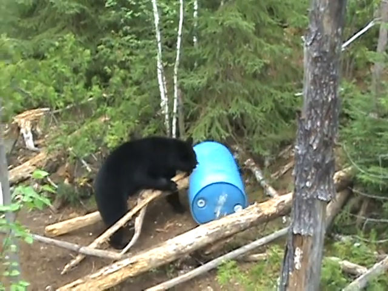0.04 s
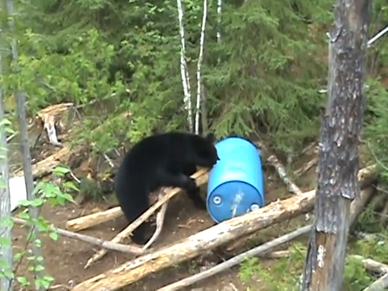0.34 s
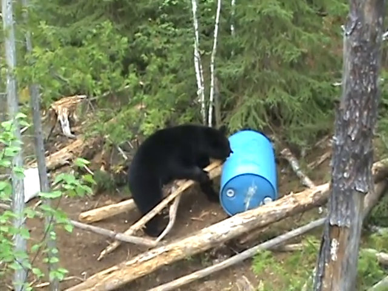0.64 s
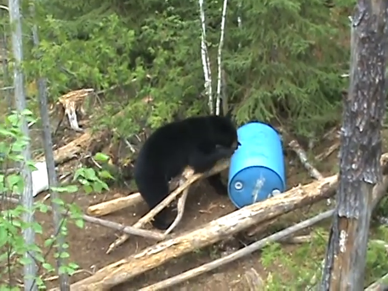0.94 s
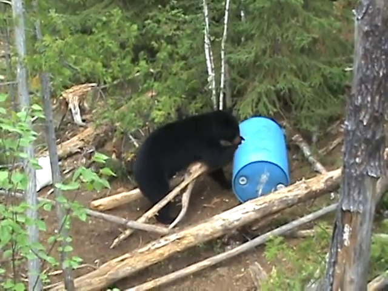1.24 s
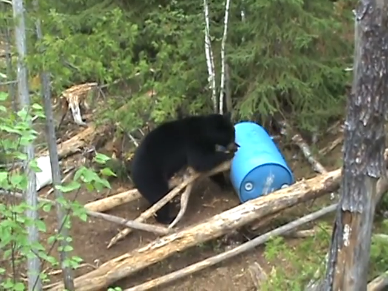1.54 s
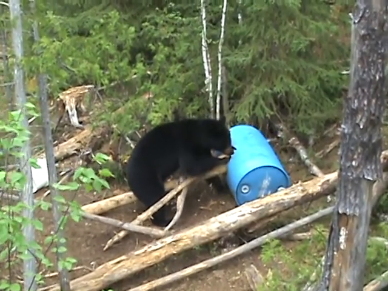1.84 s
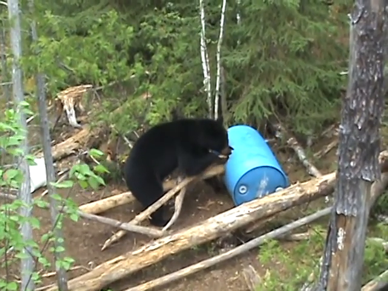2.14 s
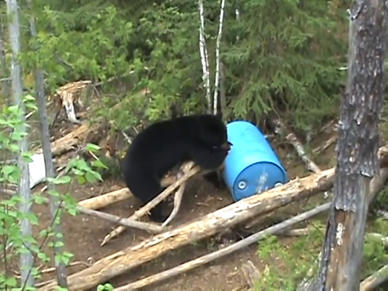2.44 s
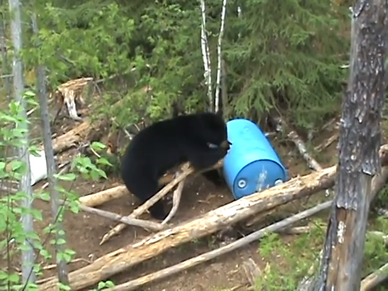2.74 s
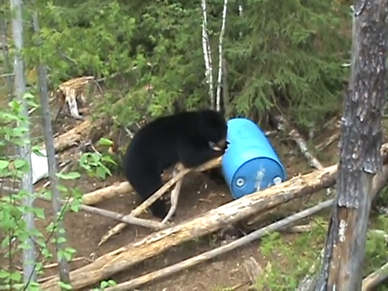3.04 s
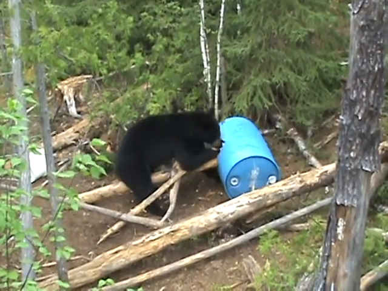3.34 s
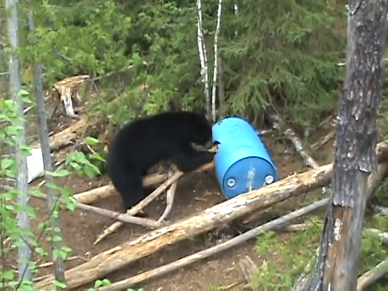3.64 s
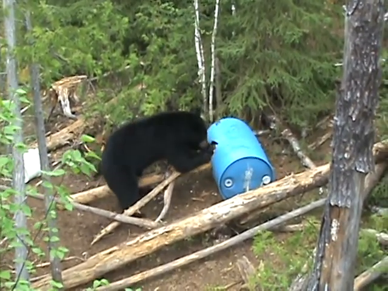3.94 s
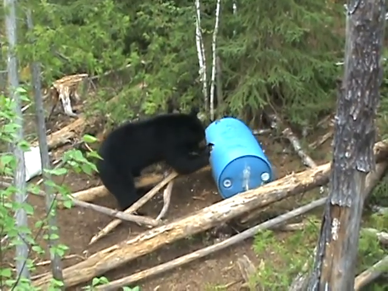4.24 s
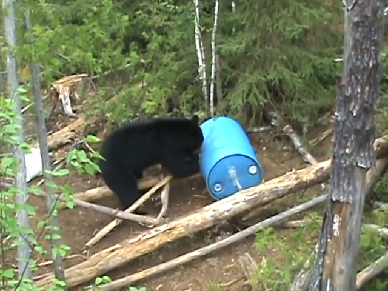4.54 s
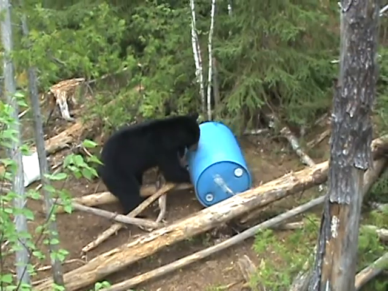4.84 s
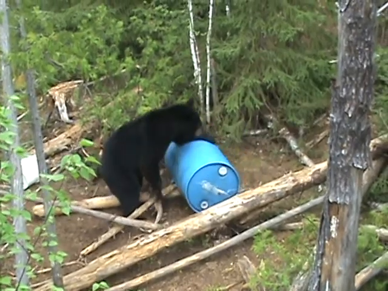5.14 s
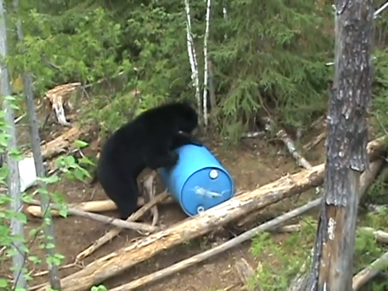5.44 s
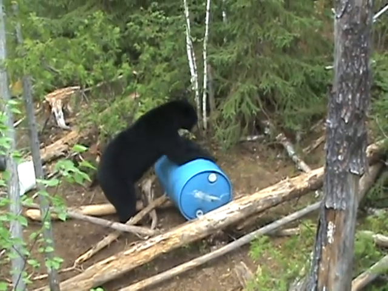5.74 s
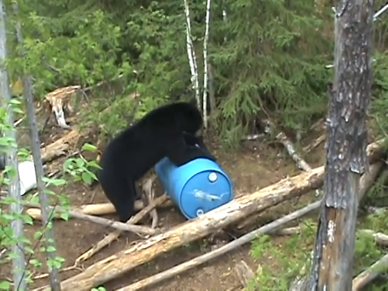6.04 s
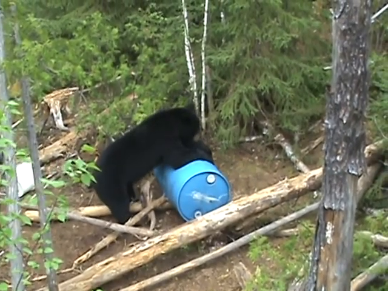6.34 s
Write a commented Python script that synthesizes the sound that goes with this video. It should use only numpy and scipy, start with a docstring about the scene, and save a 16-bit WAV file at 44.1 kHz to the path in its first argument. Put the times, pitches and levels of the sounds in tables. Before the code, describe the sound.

In a quiet forest, light wind bumps the microphone, paws scuff dry needles and a small bird gives one thin note. A bear snuffles, then shoves a hollow plastic barrel over logs in three bouts. The barrel booms, knocks and briefly groans while bark grinds and twigs crack sharply. Short puffs of breath come between the pushes and once more after the barrel settles.

```python
"""A bear shoves a hollow plastic barrel over logs and sticks in a quiet forest.
First, light wind bumps the microphone, paws scuff dry needles and a small bird calls once.
The bear snuffles, then shoves in bouts from 1.3 s, with more snuffles between. Each shove builds, holds
and dies away: stick-slip and blows make the barrel boom, groan and knock, bark grinds and rips, twigs
crack. The barrel settles, and the bear snuffles once more at 6.2 s."""
import sys
import numpy as np
from scipy import signal
from scipy.fft import rfft, irfft, next_fast_len
from scipy.io import wavfile
from scipy.ndimage import uniform_filter1d, map_coordinates

SR = 44100
rng = np.random.default_rng(int(sys.argv[2]) if len(sys.argv) > 2 else 0)


def store_pcm(level_fs):
    """Save levels as 16-bit WAV."""
    pcm = np.round(np.clip(level_fs, -1, 1) * 32767).astype(np.int16)
    wavfile.write(sys.argv[1], SR, np.atleast_2d(pcm).T)


N = 287091
TIME = np.arange(N) / SR


def amp(db):
    return 10 ** (np.asarray(db) / 20)


def unit_rms(x):
    return x / np.sqrt(np.mean(x ** 2) + 1e-20)


def along(points, hz):
    """Interpolate (freq_hz, value) points on a log axis."""
    freqs_hz, values = np.transpose(points)
    return np.interp(np.log(hz + 1), np.log(freqs_hz + 1), values)


def wobble(knots_per_s):
    """Smooth random curve, spread about 1."""
    return map_coordinates(rng.standard_normal(int(N * knots_per_s / SR) + 4), [TIME * knots_per_s])


def filtered(x, response):
    """Apply a complex frequency response."""
    size = x.shape[-1]
    padded = next_fast_len(size + 8192)
    return irfft(rfft(x, padded) * response(np.fft.rfftfreq(padded, 1 / SR)), padded)[..., :size]


def coloured(x, gain, size=8192):
    """Minimum-phase filter with magnitude gain(hz)."""
    cepstrum = irfft(np.log(np.maximum(gain(np.fft.rfftfreq(size, 1 / SR)), 1e-6)))
    cepstrum[1:size // 2] *= 2
    cepstrum[size // 2 + 1:] = 0
    return signal.fftconvolve(x, irfft(np.exp(rfft(cepstrum))))[:len(x)]


def shaped(x, spectrum):
    """Filter by (freq_hz, gain_db) points; rms 1."""
    return unit_rms(coloured(x, lambda hz: amp(along(spectrum, hz))))


def resonance(hz, centre_hz, q):
    """Band-pass magnitude, peak 1."""
    return 1 / np.hypot(1, q * (hz / centre_hz - centre_hz / (hz + 1)))


def patchy(x, depth_db, bins, frames):
    """Random gain over time and frequency: resonances come and go."""
    spectra = signal.stft(x, nperseg=512)[2]
    field = rng.standard_normal(spectra.shape)
    for axis, width in enumerate((bins, frames)):
        field = uniform_filter1d(uniform_filter1d(field, width, axis), width, axis)
    return unit_rms(signal.istft(spectra * amp(depth_db * unit_rms(field)), nperseg=512)[1][:N])


def slips(per_s, spread_db, smooth):
    """Random slip impulses of uneven size over a share of smooth friction."""
    sizes = amp(spread_db * np.minimum(rng.standard_normal(N), 2))
    impulses = (rng.random(N) < per_s / SR) * sizes * rng.choice([-1, 1], N)
    return unit_rms(impulses) + smooth * rng.standard_normal(N)


def swell(start_s, rise_s, length_s, fall_db_per_s):
    """Envelope: linear rise, hold, exponential fall from length_s after the start."""
    t = TIME - start_s
    return np.clip(t / rise_s, 0, 1) * amp(-fall_db_per_s * np.maximum(t - length_s, 0))


def add(track, start_s, sound, level_db, span_s):
    """Mix in a sound whose energy, spread over span_s, has level_db."""
    part = track[round(start_s * SR):][:len(sound)]
    part += (amp(level_db) * np.sqrt(span_s * SR) * sound / np.linalg.norm(sound))[:len(part)]


# still air: freq_hz, gain_db
HUSH_SPECTRUM = [(20, -3.5), (65, -4), (150, -10.5), (300, -10.5), (720, -10.5), (1050, -16), (2900, -18.5),
                 (16000, -32)]

def forest(level_db=-56.5):
    """Soft hush of the woods, more alike at both microphone ports in the treble."""
    common, left, right = (shaped(rng.standard_normal(N), HUSH_SPECTRUM) for _ in range(3))
    diffuse = filtered(np.array([left, right]), lambda hz: along([(3000, 1.0), (12000, 0.54)], hz))
    return amp(level_db + wobble(4.234)) * (common + diffuse)


# air on the microphone: freq_hz, gain_db
GUST_SPECTRUM = [(15, -25), (35, 0), (75, -0.5), (200, -17.5), (400, -37.5), (1500, -120)]
# gusts: start_s, length_s, level_db
GUSTS = [(0, 0.035, -27), (0.08, 0.39, -36), (0.691, 0.099, -41), (2.4, 0.1, -40.5), (2.577, 0.1, -37)]

def wind(breeze_end_s=2.53, breeze_db=-54, shared_below_hz=52):
    """Gusts and a faint draught bump the microphone; large eddies cover both ports at once."""
    gusts = [amp(level_db) * swell(start_s, 0.017, length_s, fall_db_per_s=174)
             for start_s, length_s, level_db in GUSTS + [(0, breeze_end_s, breeze_db)]]
    lumps = amp(2.2 * wobble(28))
    common, left, right = (shaped(rng.standard_normal(N), GUST_SPECTRUM) for _ in range(3))
    split_rad = lambda hz: np.arctan((hz / shared_below_hz) ** 2)
    large_eddies = filtered(common, lambda hz: np.cos(split_rad(hz)))
    small_eddies = filtered(np.array([left, right]), lambda hz: np.sin(split_rad(hz)))
    return np.max(gusts, axis=0) * lumps * (large_eddies + small_eddies) * amp([[1.5], [-1]])


# reverberation among trunks: freq_hz, t60_s
TREE_DECAY = [(100, 0.65), (2000, 0.68), (12000, 0.25)]

def trees(x):
    """Trunks scatter a short tail, different on each side."""
    hz, t, spectra = signal.stft(rng.standard_normal((2, SR // 2)), SR, nperseg=256)
    decay = amp(-60 * t / along(TREE_DECAY, hz)[:, None])
    tail = signal.istft(spectra * decay, SR, nperseg=256)[1]
    return signal.fftconvolve(x[None], tail / np.linalg.norm(tail[0]), axes=1)[:, :N]


def bird(start_s=0.488, length_s=0.053, start_hz=6200, end_hz=5750, level_db=-47):
    """One thin falling note, smeared by the trees."""
    progress = np.clip((TIME - start_s) / length_s, 0, 1)
    pitch_hz = start_hz + (end_hz - start_hz) * progress + 110 * wobble(400)
    note = np.sin(np.pi * progress) * np.sin(2 * np.pi * np.cumsum(pitch_hz) / SR)
    return amp(level_db) * (note + trees(note) / 2)


# dry needles: freq_hz, gain_db
NEEDLE_SPECTRUM = [(300, -14), (1150, 0), (2300, 1), (3600, -1.5), (4600, -3.5), (7000, -5.5),
                   (10000, -14.5), (16000, -32)]
# feet shifting before the first shove: peak_s, half_length_s, level_db
PAW_SCUFFS = [(0.025, 0.12, -49.5), (0.169, 0.064, -46), (0.34, 0.17, -50), (0.597, 0.12, -54)]

def paws():
    """Paws scuff through dry needles, which crackle."""
    needles = patchy(slips(per_s=500, spread_db=7, smooth=1.1), depth_db=3.2, bins=3, frames=15)
    scuffs = [amp(level_db) * np.exp(-((TIME - peak_s) / half_length_s) ** 2)
              for peak_s, half_length_s, level_db in PAW_SCUFFS]
    return np.linalg.norm(scuffs, axis=0) * amp(1.5 * wobble(45)) * shaped(needles, NEEDLE_SPECTRUM)


# nostril hiss: freq_hz, gain_db
NOSTRIL_SPECTRUM = [(300, 10.5), (1250, 4.5), (1750, 3), (2350, -1), (3400, -1.5), (5600, -5), (9500, -4),
                    (15000, -23)]
# puffs of breath: peak_s, length_s, hiss_db, hiss_hz, muzzle_db, muzzle_hz
PUFFS = [(0.66, 0.054, -50, 4760, -59, 786), (0.821, 0.076, -49, 3720, -75, 800),
         (0.964, 0.095, -45.5, 3960, -65, 814), (1.117, 0.027, -41, 1290, -43, 640),
         (1.161, 0.06, -45, 2000, -49.5, 825), (2.614, 0.034, -49, 3200, -49, 1300),
         (3.57, 0.056, -31, 2080, -35.5, 1770), (3.61, 0.1, -44.5, 1690, -42.5, 815),
         (4.052, 0.06, -43.5, 3460, -47, 720), (4.137, 0.065, -32.5, 2040, -34, 950),
         (5.582, 0.031, -39.5, 2420, -47, 1080), (6.189, 0.023, -47.5, 2800, -35.5, 800),
         (6.223, 0.071, -44.5, 2960, -53.5, 1110)]

def snuffles(rise_share=0.42):
    """Air swells through the muzzle's resonance and hisses at the nostrils, fluttering a little."""
    out = np.zeros(N)
    air = patchy(rng.standard_normal(N), depth_db=2.8, bins=3, frames=5)
    for peak_s, length_s, hiss_db, hiss_hz, muzzle_db, muzzle_hz in PUFFS:
        near = np.abs(TIME - peak_s) < 0.25
        t = TIME[near] - peak_s
        width_s = length_s * np.where(t < 0, rise_share, 1 - rise_share)
        flow = np.exp(-np.abs(t / width_s) ** 1.5)
        muzzle = coloured(rng.standard_normal(len(t)), lambda hz: resonance(hz, muzzle_hz, q=3.2) ** 2)
        nostrils = lambda hz: amp(along(NOSTRIL_SPECTRUM, hz)) * resonance(hz, hiss_hz, q=1.25)
        hiss = coloured(air[near], nostrils)
        out[near] += flow * (amp(muzzle_db) * unit_rms(muzzle) + amp(hiss_db) * unit_rms(hiss))
    return out * amp(1.5 * wobble(160))


# breaking dry wood: freq_hz, gain_db
WOOD_SPECTRUM = [(150, 4), (800, 16.5), (3500, 1), (9500, -1.5), (12000, -8), (16000, -12)]

def dry_wood(x, pitch_hz, q):
    """Colour x as breaking wood, emphasised near pitch_hz."""
    gain = lambda hz: amp(along(WOOD_SPECTRUM, hz)) * resonance(hz, pitch_hz, q) ** 2
    return coloured(x, gain, size=2048)


# loudest snaps of twigs and bark: start_s, level_db, pitch_hz, t60_s, band_q
LOUD_CRACKS = [(0.17, -37, 4030, 0.0038, 0.35), (0.2643, -34.5, 1200, 0.0084, .5),
               (1.4059, -25, 2860, 0.0065, 0.37), (1.421, -33.5, 10500, 0.0027, 1.3),
               (1.636, -18, 3480, 0.004, 2.1), (1.6389, -18, 3030, 0.013, 0.35),
               (1.6545, -30, 3450, 0.012, 1.1), (1.6986, -18.5, 6400, 0.0025, 0.63),
               (1.7492, -34.5, 3360, .0037, 0.35), (1.8317, -22.5, 3730, 0.0092, 0.46),
               (1.9066, -33, 3400, 0.0013, 0.89), (1.923, -29, 3330, 0.005, 1.8),
               (2.7165, -35.5, 2960, 0.0039, 2.4), (2.7819, -33, 2530, 0.0036, 1),
               (2.8015, -36.5, 7100, .003, 2.2), (2.9346, -29.5, 3780, 0.0011, 0.49),
               (2.9634, -26, 2800, 0.042, 0.43), (3.027, -31, 3020, 0.0052, 0.17),
               (3.1508, -27, 1460, 0.016, 0.25), (3.161, -32, 1010, 0.022, 0.32),
               (3.2301, -30.5, 2600, 0.031, 1.6), (3.2625, -34.5, 10000, 0.00073, 1.6),
               (3.279, -28, 2450, 0.052, 2.1), (3.3383, -40.5, 2920, 0.0055, 0.64),
               (3.3547, -38, 3840, 0.0056, 0.42), (3.493, -37.5, 2570, 0.028, 2.5),
               (3.624, -34.5, 2500, .025, 2.2), (4.2517, -31, 7500, 0.0015, 0.6),
               (4.3322, -26.5, 3400, 0.0053, 0.31), (4.3705, -28.5, 2110, 0.0045, 0.7),
               (4.3781, -22.5, 1440, 0.018, 0.53), (4.3987, -25.5, 3070, 0.029, 1.1),
               (4.4265, -25.5, 3020, 0.0057, 0.46), (4.4405, -26.5, 2780, 0.016, 0.36),
               (4.492, -25, 2860, 0.0018, 0.35), (4.4977, -23, 2640, 0.0088, 0.42),
               (4.5076, -23, 2200, 0.006, 0.66), (4.7521, -32.5, 2170, 0.0018, 0.51),
               (4.8558, -24, 3300, 0.0028, 0.24), (5.0974, -33, 3840, 0.0015, .45),
               (5.288, -28.5, 3180, 0.0055, 0.71), (5.3856, -25.5, 1120, 0.011, .4),
               (5.4341, -35, 2960, 0.0019, 0.55), (5.6203, -39, 4240, 0.0036, 0.36),
               (5.8535, -38, 1710, 0.017, 0.43)]

def cracks(rows):
    """A fibre breaks with a dry click and rings its stick; the freer the stick, the longer the ring."""
    out, t = np.zeros(N), TIME[:SR // 8]
    for start_s, level_db, pitch_hz, t60_s, band_q in rows:
        attack = 1 - np.exp(-t / 0.00024)
        decay = amp(-60 * t / t60_s) + amp(-24 - 60 * t / 0.066)
        burst = rng.standard_normal(len(t)) * attack * decay
        burst[8] += 1.5  # fracture impulse
        click = dry_wood(burst, pitch_hz, band_q)
        upper_hz = pitch_hz * rng.uniform(1.15, 1.45)
        modes = lambda hz: resonance(hz, 0.96 * pitch_hz, 4) ** 2 + 0.6 * resonance(hz, upper_hz, 6) ** 2
        ring = min(t60_s / 0.016, 1.5) * unit_rms(coloured(burst, modes, size=2048))
        add(out, start_s, unit_rms(click) + ring, level_db, span_s=0.0026)
    return out


def twigs(grit_gain, per_s=14, floor_db=-52.5, spread_db=1.5, t60_s=0.0018, band_q=0.5):
    """Small twigs break at random: faintly under the bear's weight, louder with the grinding."""
    rows = []
    for when, size, thinness in rng.random((round(per_s * N / SR), 3)):
        sample = when * (N - 1)
        level_db = 20 * np.log10(grit_gain[int(sample)] + amp(floor_db)) + spread_db * (2 * size - 1)
        pitch_hz = 2900 * 2 ** (0.2 * (2 * thinness - 1))
        rows.append((sample / SR, level_db, pitch_hz, t60_s, band_q))
    return cracks(rows)


# quick runs of tiny snaps: start_s, length_s, level_db, pitch_hz
BARK_RIPS = [(1.581, .004, -41, 5500), (1.779, 0.01, -37, 3300), (1.826, 0.024, -36, 3770),
             (4.292, 0.01, -33.5, 9300), (4.854, 0.0062, -30, 2660), (5.154, 0.0087, -38.5, 2700),
             (5.475, 0.03, -50.5, 13000)]

def rips():
    """A strip of bark gives way, fibre after fibre."""
    out, fibres = np.zeros(N), slips(per_s=2200, spread_db=13.5, smooth=1.0)
    for start_s, length_s, level_db, pitch_hz in BARK_RIPS:
        near = np.abs(TIME - start_s) < 0.2
        envelope = amp(level_db) * swell(start_s, 0.0029, length_s, fall_db_per_s=443)[near]
        out[near] += envelope * unit_rms(dry_wood(fibres[near], pitch_hz, q=0.54))
    return out


def splinters(per_s=600, centre_hz=3670, spread_octaves=0.65, decay_cycles=1.5):
    """Fibres break in bunches, each ringing a few cycles at its own pitch."""
    count, t = round(per_s * N / SR), TIME[:SR // 100]
    starts = rng.integers(N, size=(count, 1))
    thinness, size = rng.standard_normal((2, count, 1))
    hz = centre_hz * 2 ** (spread_octaves * np.minimum(thinness, 2))
    grains = amp(7 * np.minimum(size, 2)) * np.sin(2 * np.pi * hz * t) * np.exp(-hz * t / decay_cycles)
    crackle = np.bincount((starts + np.arange(len(t))).ravel(), grains.ravel())[:N]
    bunches = amp(4 * wobble(130))
    return unit_rms(bunches * crackle)


# modes of the wall and the air inside: freq_hz, level_db, t60_s
BARREL_MODES = [(73.2, -19.5, 0.48), (115, -15, 0.14), (155, -5, 0.061), (200.8, -5.5, 0.13),
                (254, -6, 0.041), (343, -14, 0.087), (412, -6.5, 0.08), (491, -6, 0.059), (598, -7, 0.035),
                (734, 0, 0.038), (827, -9, 0.037), (1400, -10, 0.011)]

def barrel_ring():
    """Response to one tap; each spot on the wall weighs the modes anew."""
    t = TIME[:SR // 2]
    return sum(amp(level_db + rng.normal(0, 3.9) - 60 * t / t60_s)
               * np.sin(2 * np.pi * freq_hz * rng.normal(1, 0.015) * t)
               for freq_hz, level_db, t60_s in BARREL_MODES)


# blows on the barrel: start_s, level_db, centre_hz, band_q
BLOWS = [(0.522, -48, 650, 0.7), (1.112, -44.5, 520, .5), (1.6448, -32, 700, 0.4), (1.681, -28, 576, 0.19),
         (1.837, -38.5, 600, 0.37), (2.326, -32, 650, 1.06), (3.4498, -37.5, 610, 0.44),
         (4.149, -32, 440, 1.1), (4.8572, -22.5, 550, 0.56), (4.857, -25, 166, 0.98),
         (4.866, -24.5, 650, 0.51), (4.92, -39, 85, 1.2), (5.1794, -32.5, 250, 0.3),
         (5.2055, -27.5, 470, 0.19), (5.2506, -30.5, 453, 0.14), (5.258, -27, 230, 0.5),
         (5.416, -34.5, 600, 0.47), (5.862, -44, 434, 0.87), (5.877, -42.5, 149, 0.92)]

def knocks(buzz_gain=0.46, buzz_t60_s=0.043, thunk_db=-8, thunk_t60_s=0.0056):
    """A blow thunks on the log and rings a band of the barrel's modes; the contact chatters briefly."""
    out, t = np.zeros(N), TIME[:SR // 2]
    for start_s, level_db, centre_hz, band_q in BLOWS:
        contact = buzz_gain * rng.standard_normal(len(t)) * amp(-60 * t / buzz_t60_s)
        contact[0] += 1
        ring = signal.fftconvolve(barrel_ring(), contact)[:len(t)]
        ring = coloured(ring, lambda hz: resonance(hz, centre_hz, band_q) ** 2)
        thunk = np.sin(2 * np.pi * centre_hz * t) * t * amp(-60 * t / thunk_t60_s)
        add(out, start_s, unit_rms(ring) + amp(thunk_db) * unit_rms(thunk), level_db, span_s=0.026)
    return out


# barrel juddering along a log: start_s, length_s, level_db, slips_per_s, centre_hz
JUDDERS = [(2.851, 0.055, -33.5, 174, 710), (3.432, 0.0089, -36, 150, 624)]

def groans(jitter=0.07, fall_db_per_s=450):
    """Nearly regular slips drive the barrel's modes into a short hollow groan."""
    out, t = np.zeros(N), TIME[:SR // 4]
    for start_s, length_s, level_db, slips_per_s, centre_hz in JUDDERS:
        gaps_s = np.exp(jitter * rng.standard_normal(64)) / slips_per_s
        slip_samples = ((np.cumsum(gaps_s) - gaps_s[0]) * SR).astype(int)
        taps = np.bincount(slip_samples, minlength=len(t))[:len(t)]
        push = np.minimum(0.5 + t / 0.004, 1) * amp(-fall_db_per_s * np.maximum(t - length_s, 0))
        ring = signal.fftconvolve(taps * push, barrel_ring())[:len(t)]
        groan = coloured(ring, lambda hz: resonance(hz, centre_hz, q=0.38))
        add(out, start_s, groan, level_db, span_s=length_s)
    return out


def wall_shudder():
    """The rubbing contact wanders over the wall, fading between four mixes of the modes."""
    spot_gains = np.array([wobble(7) for _ in range(4)])
    spot_gains /= np.linalg.norm(spot_gains, axis=0)
    shudder = np.zeros(N)
    for gain in spot_gains:
        friction = slips(per_s=450, spread_db=1, smooth=0.43)
        shudder += gain * unit_rms(signal.fftconvolve(friction, barrel_ring())[:N])
    return unit_rms(coloured(shudder, lambda hz: resonance(hz, 385, q=0.48)))


# the bear's pushes: start_s, rise_s, length_s, drum_db, wall_db, grit_db
SHOVES = [(1.312, 0.08, 0.54, -41.5, -48, -46), (1.497, 0.055, 0.18, -36, -37, -41.5),
          (2.712, 0.15, 0.25, -39.5, -42, -41), (3.003, 0.068, 0.35, -53, -55, -48.5),
          (3.389, 0.067, 0.063, -38.5, -43, -42.5), (4.277, 0.019, 0.091, -45, -38, -34),
          (4.33, 0.076, 0.16, -32.5, -36, -35), (4.542, 0.04, 0.074, -47, -43, -45),
          (4.665, 0.1, 0.27, -41.5, -43, -45.5), (4.933, 0.031, 0.26, -51, -44, -48.5),
          (5.051, 0.02, 0.43, -38, -40.5, -49.5), (5.574, 0.042, 0.042, -55, -41.5, -70)]

def shove_gains(barrel_lag_s=0.029, build_db=0.5, settle_db=-7):
    """Drum, wall and grit envelopes: each shove builds, stops and leaves the barrel rocking to rest."""
    power = np.zeros((3, N))
    for start_s, rise_s, length_s, drum_db, wall_db, grit_db in SHOVES:
        build = amp(-build_db * np.clip(1 - (TIME - start_s) / length_s, 0, 1))
        settling = amp(settle_db) * swell(start_s, rise_s, length_s, fall_db_per_s=55)
        drum = np.maximum(swell(start_s, rise_s + barrel_lag_s, length_s, fall_db_per_s=119), settling)
        wall = swell(start_s, rise_s + barrel_lag_s, length_s, fall_db_per_s=173)
        grit = np.maximum(swell(start_s, rise_s, length_s, fall_db_per_s=173), settling)
        power += (build * amp([[drum_db], [wall_db], [grit_db]]) * [drum, wall, grit]) ** 2
    return np.sqrt(power)


# hollow drum of the barrel: freq_hz, gain_db
DRUM_SPECTRUM = [(20, -6), (42, -7.5), (66, 3.5), (100, 4.5), (140, -14.5), (205, -7), (900, -120)]
# crumbling bark: freq_hz, gain_db
BARK_SPECTRUM = [(300, -24), (800, 0.5), (1700, -1.5), (3000, -1), (4000, -7), (5500, -9.5), (9600, -10.5),
                 (12500, -20.5), (16000, -37)]

def dragging(drum_gain, wall_gain, grit_gain, tear_db=-10, full_load_db=-34):
    """Stick-slip on the logs shakes drum and wall and crumbles bark; heavy load tears fibres."""
    catch = amp(1.6 * wobble(38))  # the barrel catches and lets go
    boom = drum_gain * shaped(slips(per_s=230, spread_db=6, smooth=0.21), DRUM_SPECTRUM)
    rub = wall_gain * wall_shudder()
    crumbs = patchy(slips(per_s=900, spread_db=6, smooth=0.8), depth_db=3.3, bins=4, frames=2)
    bark = grit_gain * shaped(crumbs, BARK_SPECTRUM)
    load = np.minimum(grit_gain / amp(full_load_db), 1)
    tearing = grit_gain * np.sqrt(load) * amp(tear_db) * splinters()
    return catch * (boom + rub + bark + tearing)


# phase between microphone ports: freq_hz, left_lead_rad
PORT_PHASE = [(45, 1), (250, -0.75), (950, -0.77), (3000, -0.18)]
# balance between microphone ports: freq_hz, left_minus_right_db
PORT_BALANCE = [(110, 1), (380, -1), (1300, -1.5), (4400, 0)]

def ports(x):
    """Two close microphone ports hear one sound, shifted in phase and level."""
    side = np.array([[0.5], [-0.5]])
    return filtered(x, lambda hz: amp(side * along(PORT_BALANCE, hz))
                    * np.exp(1j * side * along(PORT_PHASE, hz)))


def scene():
    """Stereo mix: bird, wind and hush behind the bear and its barrel among the trees."""
    drum_gain, wall_gain, grit_gain = shove_gains()
    background = bird() + wind() + forest()
    barrel = dragging(drum_gain, wall_gain, grit_gain) + groans() + knocks()
    foreground = barrel + rips() + snuffles() + paws() + cracks(LOUD_CRACKS) + twigs(grit_gain)
    return background + ports(foreground) + amp(-17.5) * trees(foreground)


def record(dry):
    """Brick-wall low-pass at 15.9 kHz."""
    return filtered(dry, lambda hz: hz < 15900)


dry = scene()
out = record(dry)
store_pcm(out)
```